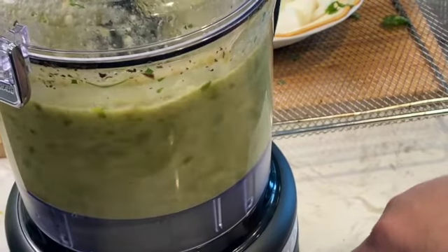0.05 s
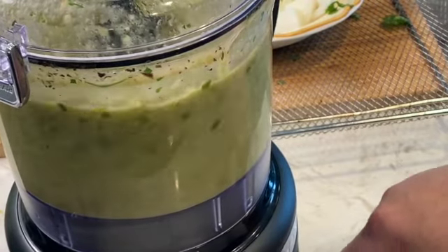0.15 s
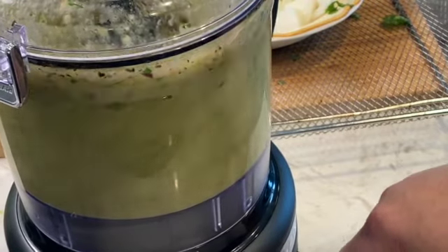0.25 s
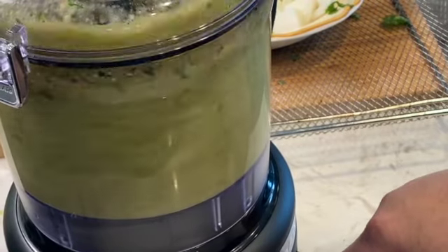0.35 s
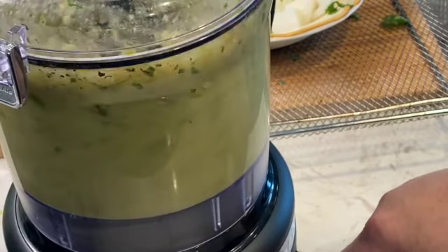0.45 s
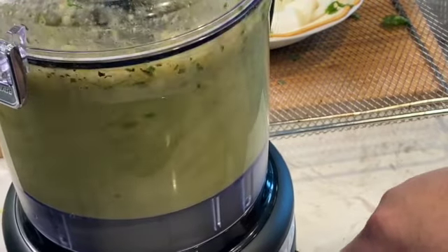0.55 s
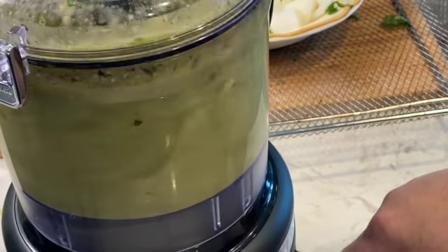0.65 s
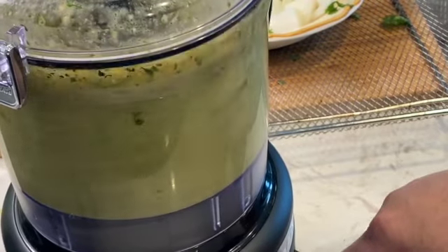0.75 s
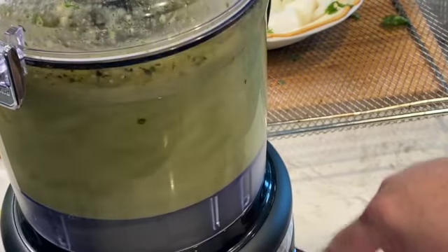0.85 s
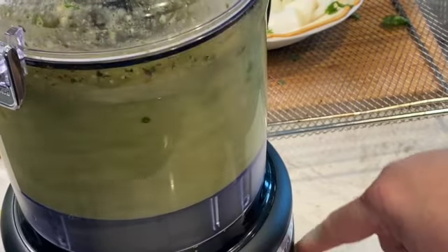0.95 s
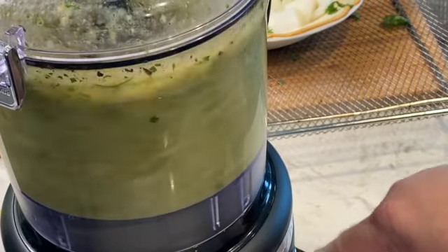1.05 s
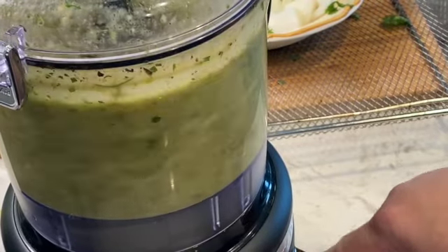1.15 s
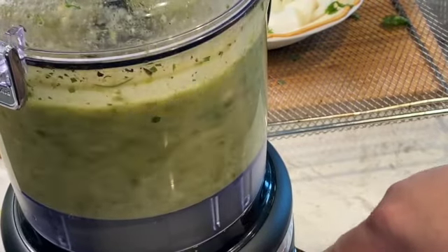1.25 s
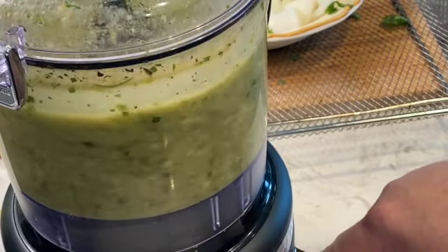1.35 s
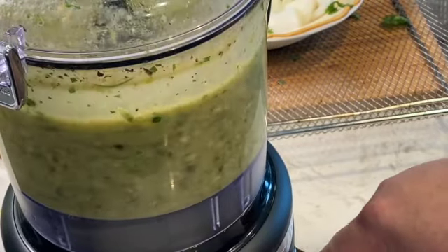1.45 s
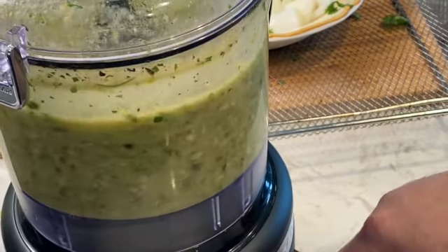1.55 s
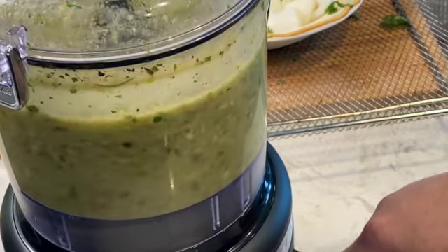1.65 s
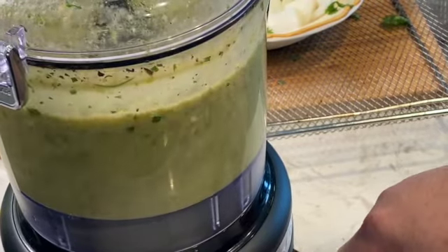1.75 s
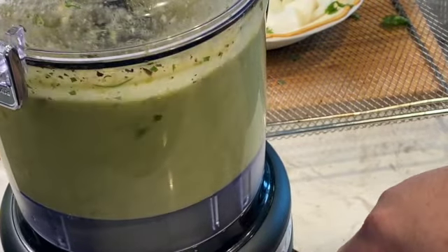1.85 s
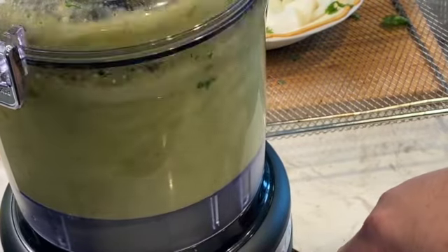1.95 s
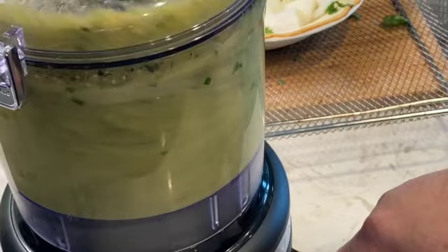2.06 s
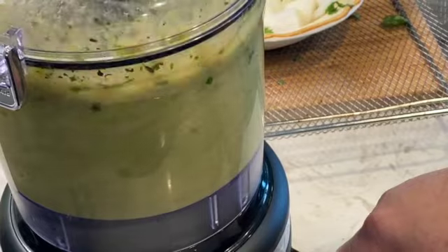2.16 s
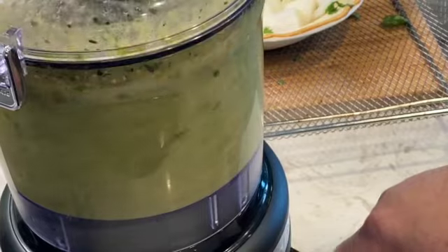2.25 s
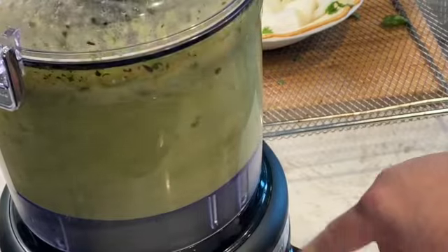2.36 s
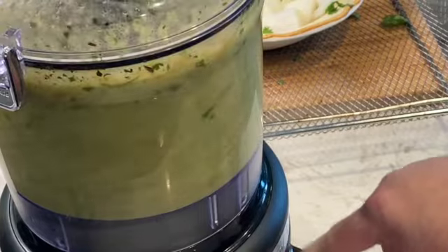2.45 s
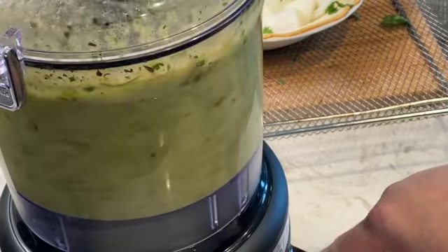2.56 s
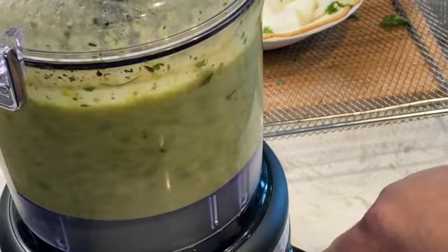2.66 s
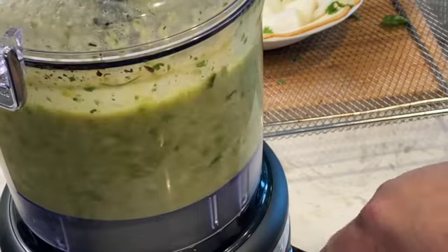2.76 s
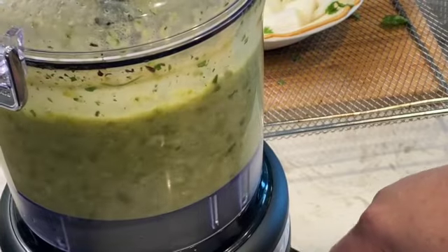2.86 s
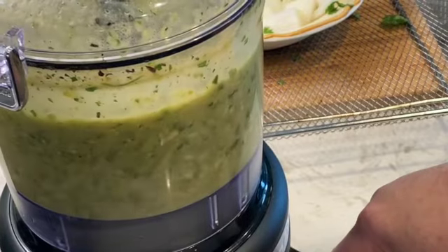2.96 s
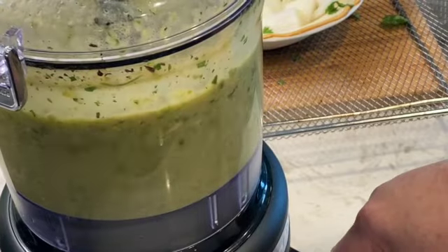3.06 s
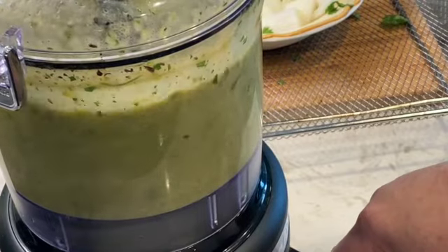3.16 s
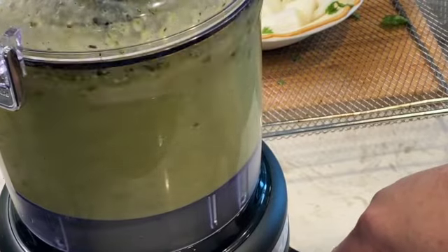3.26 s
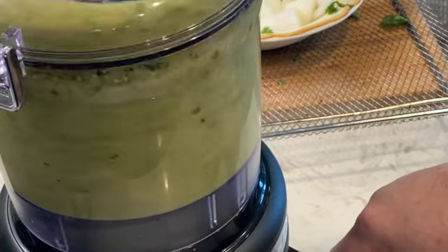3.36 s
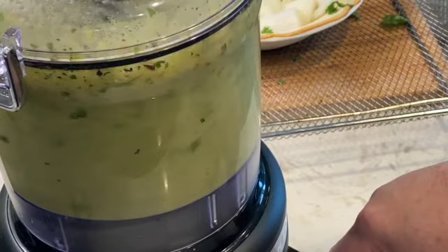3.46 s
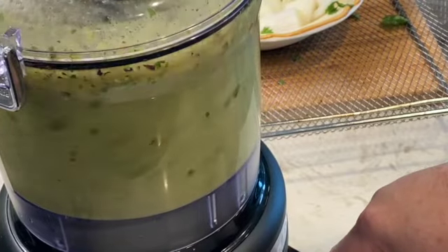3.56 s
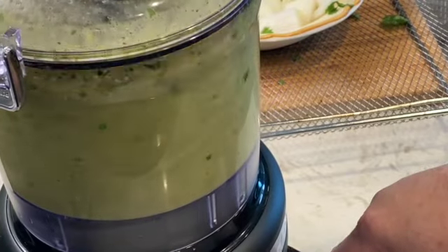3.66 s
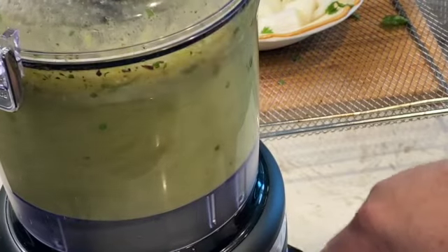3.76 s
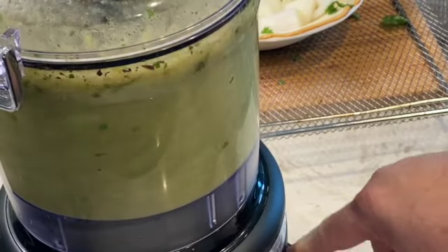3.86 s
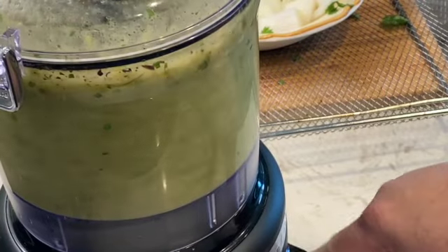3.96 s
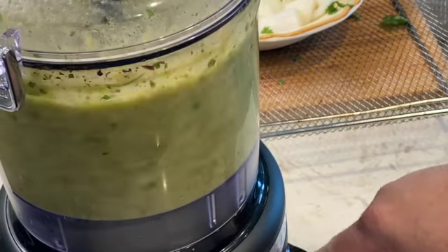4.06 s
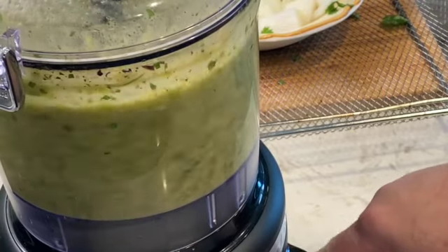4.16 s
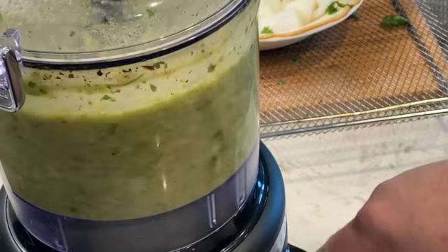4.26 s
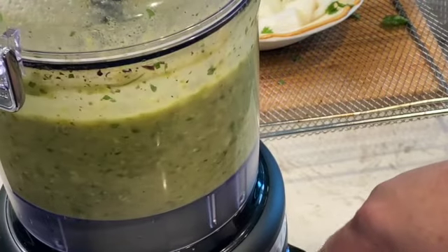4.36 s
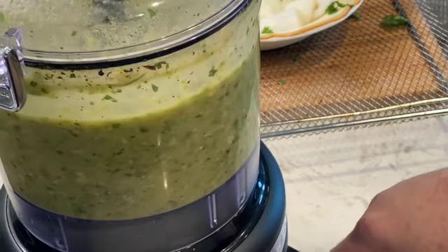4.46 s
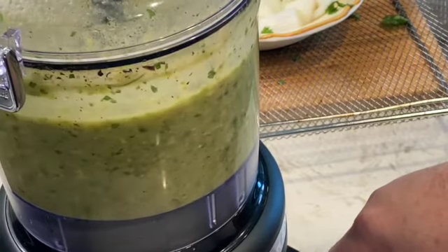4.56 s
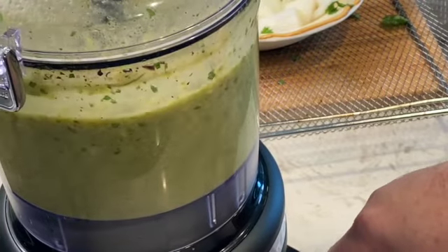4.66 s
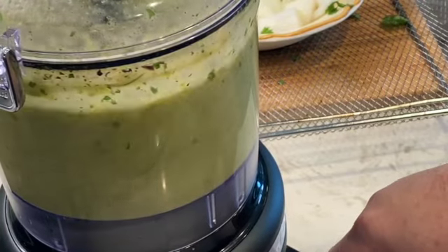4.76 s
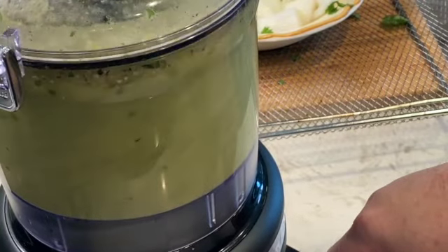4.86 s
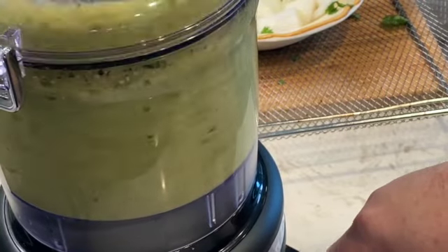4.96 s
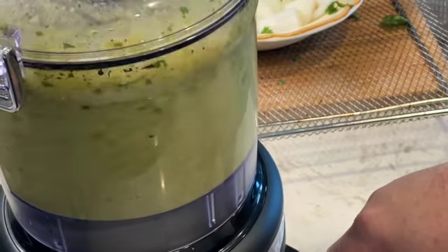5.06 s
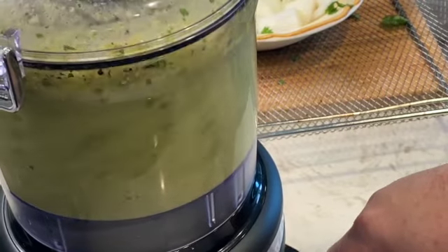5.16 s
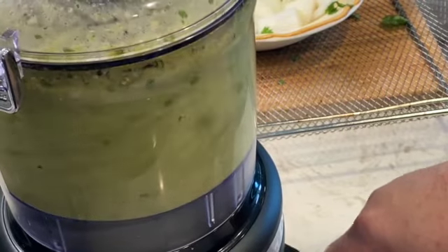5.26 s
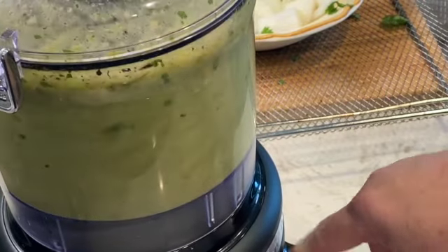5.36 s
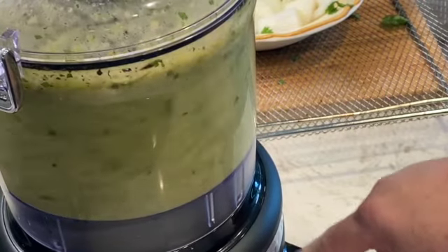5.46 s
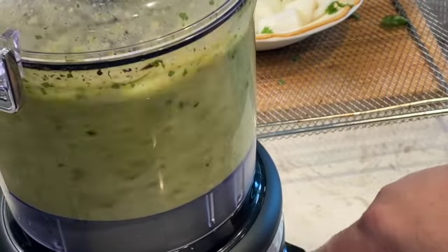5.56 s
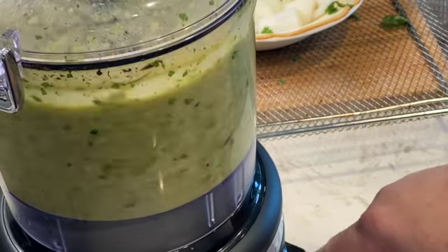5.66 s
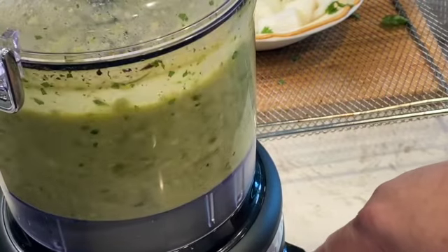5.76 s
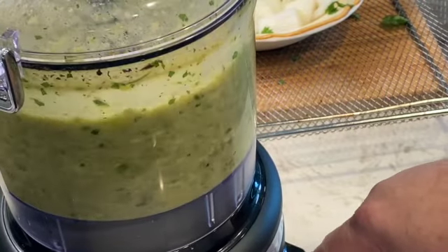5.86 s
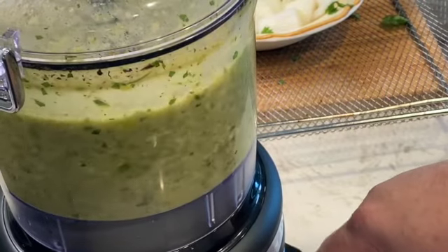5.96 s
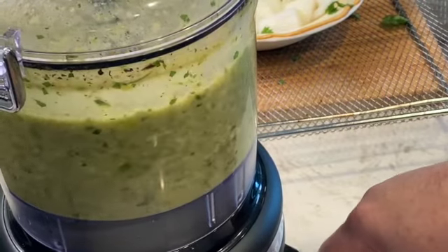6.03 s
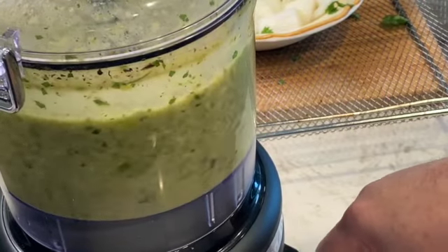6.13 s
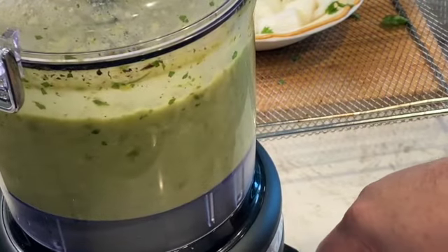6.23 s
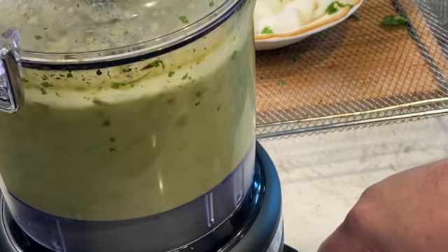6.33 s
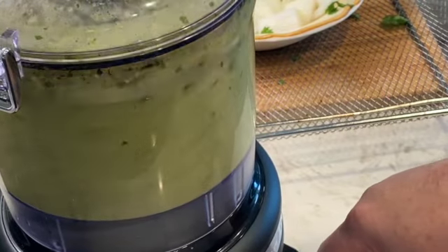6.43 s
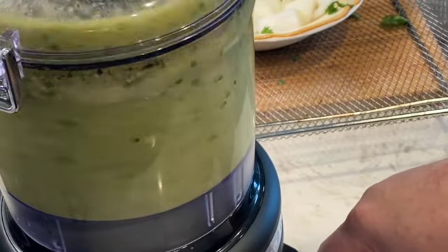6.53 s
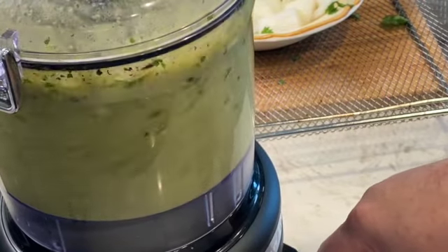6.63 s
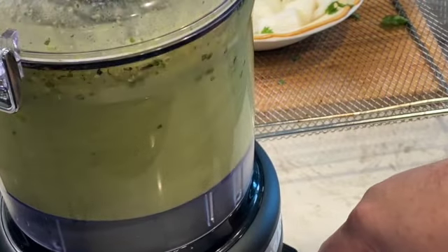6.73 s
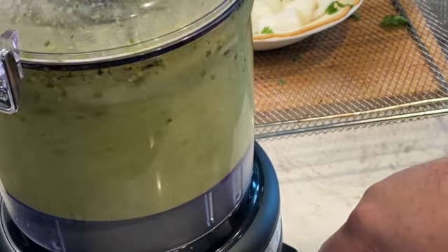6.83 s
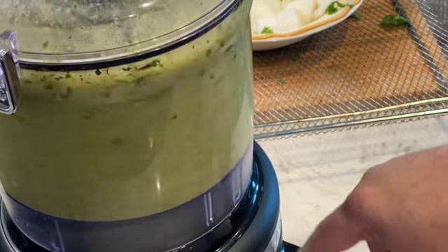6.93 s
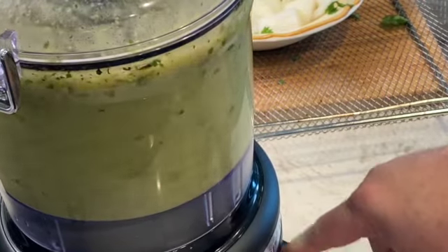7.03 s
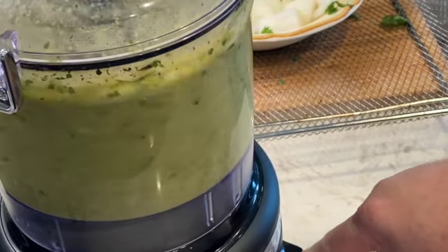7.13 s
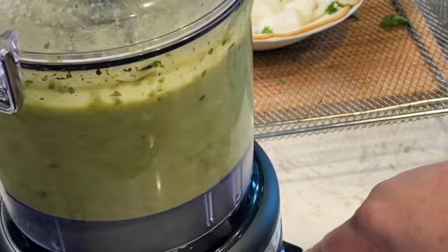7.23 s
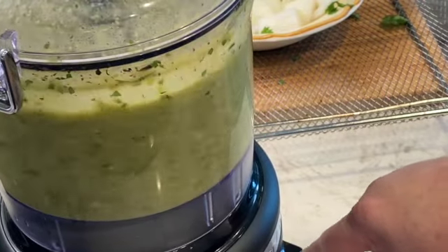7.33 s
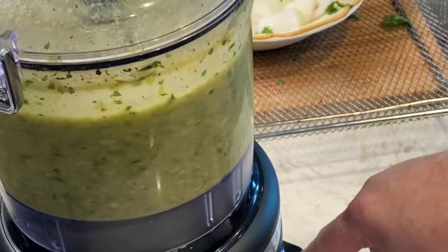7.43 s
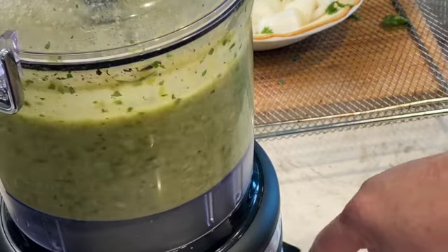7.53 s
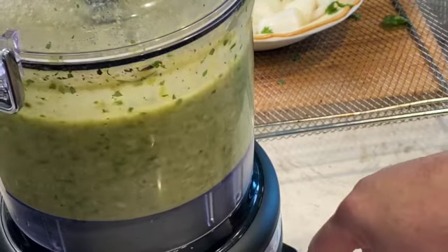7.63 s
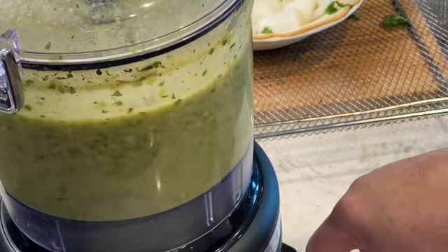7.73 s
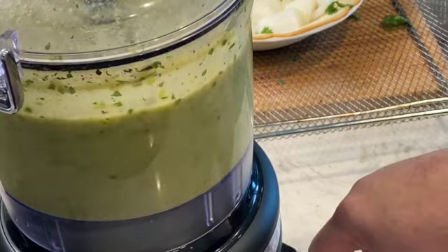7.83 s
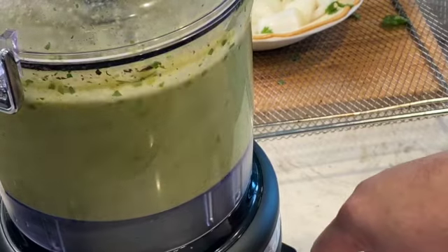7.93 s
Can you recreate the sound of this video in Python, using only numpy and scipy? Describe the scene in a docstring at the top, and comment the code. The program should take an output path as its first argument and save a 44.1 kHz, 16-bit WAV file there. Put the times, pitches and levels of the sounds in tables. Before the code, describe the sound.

A food processor holding thick green soup is pulsed six times in a hard-walled kitchen, heard close in stereo. It engages at once at the start, then near 1.6, 2.9, 4.5, 6.1 and 7.6 seconds, the last still running at the end. Before each later burst a small plastic button click comes about a tenth of a second ahead, then a sharp double knock as the drive takes up. The gear whine leaps up, rough and strained, and over half a second creeps higher into a cleaner, shrill tone. Dense wet churning, housing rattle and a low fluctuating counter drone run with it. After about 0.8 seconds each is let go: whine drops quickly and vanishes, soup turns duller, lumpy and gurgling, and slack drive parts knock, strongest near 2.5 and 3.9 seconds. Faint ticks, short reflections and very quiet low room tone fill the gaps.

```python
"""A food processor is pulsed six times: its motor runs up with a gear whine and coasts down when let go.
The whine is tones and noise bands locked to the shaft; the churn of thick soup is patchy noise beaten
by the blades; the drone is jolts and noise ringing the base on the kitchen counter.
Noise bursts make the button clicks and the knocks in the drive.
A hard-walled kitchen answers with decaying noise, over a faint room tone."""
import sys
import numpy as np
from scipy import signal
from scipy.fft import rfft, irfft, next_fast_len
from scipy.io import wavfile
from scipy.ndimage import uniform_filter1d, map_coordinates

SR = 44100
rng = np.random.default_rng(int(sys.argv[2]) if len(sys.argv) > 2 else 0)


def wrap_up_sound(samples):
    """Save the sound to the file named by the first command line argument, as 16-bit audio."""
    columns = np.atleast_2d(samples).T
    # keep every value between -1 and 1, then stretch to whole-number steps
    tamed = np.clip(columns, -1, 1)
    steps = np.round(tamed * 32767).astype(np.int16)
    wavfile.write(sys.argv[1], SR, steps)


N = 352359
T = np.arange(N) / SR

# The six pulses. Each row: drive engages in seconds, button touched this many seconds before that,
# soup up to speed this many seconds after, let go this many seconds after, churn level in dB,
# drone level in dB, level of the first knock in dB.
PULSES = [(0.045, 0.1, 0.36, 0.85, -20, -25.5, 0.5), (1.622, .097, .46, 0.74, -19.5, -24.5, -0.5),
          (2.949, .096, .42, .81, -20, -24, 3.5), (4.499, .1025, .46, .80, -20, -25, -7),
          (6.054, .0944, .48, 0.85, -20, -24.5, -2.5), (7.632, .0935, .46, .8, -21, -25, -0.5)]
# Resonances of bowl and housing. Each row: frequency in Hz, width in Hz, level in dB.
HOUSING = [(864, 300, -5), (1178, 100, 3), (1406, 64, -0.5), (1658.5, 74, 4), (2056, 42, -7.5),
           (2184, 79, 2.5), (2550, 210, -1), (2820, 170, 6), (3053, 110, 6.5), (4470, 33, -6.5)]
TEETH = 43  # mesh cycles a blade turn
FULL_HZ = 1869  # mesh rate that counts as full speed


def amp(db):
    """Gain of a level in dB."""
    return 10 ** (np.asarray(db) / 20)


def unit(x):
    """x at rms 1."""
    return x / np.sqrt(np.mean(x ** 2) + 1e-20)


def along(points, hz):
    """Read a curve of (Hz, value) points on a log frequency axis."""
    f, v = np.transpose(points)
    return np.interp(np.log(hz + 1), np.log(f + 1), v)


def wobble(rate):
    """A smooth random curve through rate knots a second."""
    knots = rng.standard_normal(int(N * rate / SR) + 4)
    return map_coordinates(knots, [T * rate], order=2)


def filtered(x, response):
    """x shaped by a complex response of frequency."""
    m = next_fast_len(N + SR // 4)
    return irfft(rfft(x, m) * response(np.fft.rfftfreq(m, 1 / SR)), m)[..., :N]


def modes(table):
    """Causal response of (Hz, width in Hz, dB) resonances, alternating in sign."""
    def response(f):
        total = 0
        for k, (centre, width, db) in enumerate(table):
            damping = 1j * f * width
            total = total + (-1) ** k * amp(db) * damping / (centre * centre - f * f + damping)
        return total
    return response


def patchy(depth_db):
    """Noise with patches of random gain in time and frequency."""
    z = signal.stft(rng.standard_normal(N), nperseg=512)[2]
    field = uniform_filter1d(rng.standard_normal(z.shape), size=6, axis=0)
    field = uniform_filter1d(field, size=6, axis=1)
    return signal.istft(z * amp(depth_db * unit(field)), nperseg=512)[1][:N]


def machine():
    """Whine, churn and drone all follow one shaft, so they run up and coast down together."""
    since, whirl, coast, churn_db, drone_db = controls()
    hz = speed(since, whirl, coast)
    off = 1. * (coast > 0)
    unsteady = (.002 + 0.01178 * (1 - whirl) ** .5) * wobble(50)
    mesh = 2 * np.pi * np.cumsum(hz * (1 + unsteady)) / SR
    turn = mesh / TEETH
    slow = np.clip(1 - hz / FULL_HZ, 0, .6)
    # the teeth strain while the motor gains speed and unload once the current is cut
    strain = np.clip((FULL_HZ - hz) / 75, 0, 1) * (1 - off)

    whine_db, whine_out_s = -1, .17  # over the churn; gone this long after the button is let go
    whine = gears(mesh, strain) * amp(whine_db + 5.03 * strain - 66 * slow * off)
    whine = whine * np.clip((whine_out_s - coast) / 0.023, 0, 1)
    whine = whine * np.clip(since / .03, .45, 1)
    churn = soup(turn, slow, strain, off)

    drag_db, surge_db, surge_s = 2, 3, .05  # extra while the soup is dragged up to speed; first bite
    churn_db = churn_db + drag_db * strain + surge_db * np.exp(-np.abs(since) / surge_s)
    drone_db = drone_db + 2.5 * wobble(14)  # the drone swells and dips at random
    sound = amp(churn_db) * (whine + churn) + amp(drone_db) * base_drone(turn, hz)
    return (since >= 0) * sound


def controls():
    """Per sample: seconds since engaging, run-up share, seconds since letting go, churn and drone dB."""
    # The fall in level while coasting, the same after each pulse. Each row: seconds after letting go,
    # change of the churn in dB, change of the drone in dB.
    coasting = [(0, -0.5, -0.5), (.1, -2, -2.5), (.2, -10.5, -18), (0.258, -21, -20.5), (.32, -29.5, -21.5),
                (.45, -45.5, -28), (.6, -58.5, -57.5)]
    after, churn_fall, drone_fall = np.transpose(coasting)
    rows = np.array(PULSES)
    now = rows[np.clip(np.searchsorted(rows[:, 0], T) - 1, 0, None)].T
    since = T - now[0]
    whirl = np.clip(since / now[2], 0, 1)
    coast = np.clip(since - now[3], 0, None)
    churn_db = now[4] + np.interp(coast, after, churn_fall)
    drone_db = now[5] + np.interp(coast, after, drone_fall)
    return since, whirl, coast, churn_db, drone_db


def speed(since, whirl, coast):
    """Mesh rate: the rotor leaps up, creeps on as the soup starts to whirl, and slows once let go."""
    loaded_hz, free_hz = 1547, 1859.4  # mesh rate in still and in whirling soup
    spin_up_s, slow_down_s = .06, .25  # time constants of rotor and coasting
    head_start_s = .017  # the rotor starts this long before the drive engages
    # tanh: run-up against a drag that grows with speed squared
    leap = np.tanh((np.abs(since) + head_start_s) / spin_up_s)
    return (loaded_hz + (free_hz - loaded_hz) * whirl) * leap * np.exp(-coast / slow_down_s)


def gears(mesh, strain):
    """Clean lines sit inside noise bands; below full speed the teeth strain and the bands take over."""
    # Multiples of the mesh rate, from the first up. Each row: clean line level in dB, blurred band level
    # in dB, band width in Hz, gain of the band under strain in dB, depth of the throb with the turn 0-1.
    multiples = [(-15, -2, 130, -1.5, 1), (-4, -14.5, 360, 10.5, .2), (-32, -10, 640, 5, 0.3),
                 (-30.5, -12, 700, 3, 0.2), (-38, -21, 970, 4, 0.03), (-46, -33, 480, 13, 0)]
    # Clean lines beside the mesh tone once the drive runs free. Each row: blade turns above the mesh # rate
    # (rounded to whole turns, halves to the even one), level in dB.
    sidebands = [(-7, -13), (-4, -4.5), (-4, -13), (-1, -11), (-0.5, -13.5), (2.5, -3), (4.5, -15.5)]
    whine = 0
    for k, (line_db, band_db, width_hz, strain_db, throb) in enumerate(multiples):
        a, b = rng.uniform(0, 2 * np.pi, size=2)
        phase = (k + 1) * mesh
        # uneven teeth: strength repeats each turn and half turn, which makes sidebands
        swing = 1 + throb * (np.sin(mesh / TEETH + a) + np.sin(2 * mesh / TEETH + b))
        line = amp(line_db + 2.0 * wobble(30)) * (1 - .8 * strain) * np.sin(phase)
        band = wobble(width_hz) * np.sin(phase) + wobble(width_hz) * np.cos(phase)
        whine = whine + swing * (line + amp(band_db + strain_db * strain) * band)
    for turns, db in sidebands:
        phase = (1 + round(turns) / TEETH) * mesh + rng.uniform(0, 2 * np.pi)
        whine = whine + amp(db + 2.5 * wobble(12)) * (1 - strain) * np.sin(phase)

    def housing_colour(f):
        low_cut = 1 + (950 / (f + 1)) ** 4  # the housing is too small to send out low tones
        return (0.67 + 1.4 * modes(HOUSING)(f)) / low_cut
    return filtered(unit(whine), housing_colour)


def soup(turn, slow, strain, off):
    """Blades beat patchy noise into soup and housing rattle; the bowl rings with gurgle and slump."""
    # Colour of the churn. Each row: frequency in Hz, relative level in dB.
    churn_colour = [(18, -48.5), (30, -15), (124, -16), (205, -6.5), (260, -19.5), (994, -21.5),
                    (1870, -13), (3340, -18.5), (7550, -23), (8300, -25), (10900, -30.5), (14600, -30.5),
                    (15900, -24.5), (16300, -45.5)]
    # Resonances of the soup-filled bowl, two for the gurgle, then two for the slump.
    # Each row: frequency in Hz, width in Hz, level in dB.
    bowl = [(618, 45, -6.5), (678, 80, 0.5), (926, 27, 4), (1036, 14, -2.5)]
    mains_hz = 120  # magnetic pull, twice the line frequency
    # two blades sweep the soup each turn; the mains pull shakes the rotor
    beat_db = .9 * np.sin(2 * turn) + 1.1 * np.sin(2 * np.pi * mains_hz * T) + 1.1 * wobble(150)
    beat = amp(beat_db)
    splash = unit(filtered(beat * patchy(depth_db=2.5), lambda f: amp(along(churn_colour, f))))
    rattle = unit(filtered(beat * patchy(depth_db=1.0), modes(HOUSING))) * amp(3.7 * slow)
    # once the soup whirls freely it gurgles in the bowl, most clearly as it slumps back
    gurgle = unit(filtered(amp(3.5 * wobble(18)) * rng.standard_normal(N), modes(bowl[:2])))
    gurgle = gurgle * amp(-16.5 - 15 * strain + 1.7 * slow * off)
    slump = unit(filtered(amp(4.5 * wobble(25)) * rng.standard_normal(N), modes(bowl[2:])))
    slump = slump * amp(-32.5 + 41.2 * slow * off)
    churn = amp(-5.5) * splash + amp(-9.0) * rattle + gurgle + slump
    dull = filtered(churn, lambda f: 1 / (1 + (f / 1800) ** 2.2))
    spray = (churn - dull) * amp(-27 * slow * off)  # coasting blades spray less
    lumps = amp(slow * (5.5 * np.sin(2 * turn) + 8.2 * wobble(22)))  # a slow blade meets lumps
    return lumps * (dull + spray)


def base_drone(turn, hz):
    """One jolt each blade turn, and noise, shake the base into resonance on the counter."""
    # Resonances of the base on the counter. Each row: frequency in Hz, width in Hz, level in dB.
    base = [(118, 23, -17), (172.5, 14, -6.5), (213, 16.2, 1), (312.5, 46, -12), (410.2, 66, -14)]
    jolts = np.diff(np.floor(turn / (2 * np.pi)), prepend=0) * amp(2.5 * wobble(40))
    shake = unit(jolts) + 1.4 * (hz / FULL_HZ) ** 0.69 * rng.standard_normal(N)

    def base_colour(f):
        dip = 1 - .85 * modes([(259, 46, 0)])(f)  # the base sends out little here
        return modes(base)(f) * dip / (1 + (140 / (f + 1)) ** 4) / (1 + (f / 700) ** 2)
    return unit(filtered(shake, base_colour))


def contacts():
    """Small plastic clicks of the button, and heavier knocks that ring the housing."""
    # Faint ticks as things settle. Each row: start in seconds, level in dB, low part in dB.
    ticks = [(1.2426, -34.5, -6), (1.3514, -41.5, -1), (2.6878, -46, 14.5), (4.3365, -42, 0)]
    # Slack in the drive knocks as it stops. Each row: start in seconds, level in dB.
    stops = [(1.039, -19), (2.491, -14), (3.945, -13), (3.98, -21), (5.553, -40), (7.089, -27)]
    button_db, button_low_db, switch_db, switch_low_db = -23, -22, -16, -13  # level, low part under it
    switch_s = .015  # the current flows this long before the slack is taken up
    rebound_s, rebound_db = .019, -8  # the drive knocks a second time
    clicks, blows, t = np.zeros(N + SR), np.zeros(N + SR), T[:SR // 10]
    # a touch that would fall before the start is left out
    taps = [(s - lead, button_db, button_low_db) for s, lead, *_ in PULSES if s > lead]
    taps += [(s - switch_s, switch_db, switch_low_db) for s, *_ in PULSES]
    taps += ticks
    knocks = [(s, db) for s, *_, db in PULSES]
    knocks += [(s + rebound_s, rebound_db) for s, *_ in PULSES]
    knocks += stops
    for s, db, low_db in taps:
        snap, thud = rng.standard_normal((2, len(t)))
        snap = snap * amp(-60 * t / .055)
        thud = uniform_filter1d(thud, size=14) * amp(low_db + 8.0 - 60 * t / 0.16)
        clicks[round(s * SR):][:len(t)] += amp(db - 11) * (snap + thud)
    for s, db in knocks:
        blow = amp(db - 18 - 60 * t / 0.024) * rng.standard_normal(len(t))
        blows[round(s * SR):][:len(t)] += blow

    def knock_colour(f):
        direct = 0.2 * f / (f + 400) / (1 + (f / 7000) ** 2)
        return 6.5 * modes(HOUSING)(f) + direct
    soft_clicks = filtered(clicks[:N], lambda f: 1 / (1 + (f / 8000) ** 2))
    return soft_clicks + filtered(blows[:N], knock_colour)


def kitchen(x):
    """The hard-walled room answers with a noise tail; each frequency dies at its own speed."""
    # Decay of the room. Each row: frequency in Hz, time to fall by 60 dB in seconds.
    decay = [(200, 0.32), (1500, 0.34), (10000, 0.25)]
    hz, t, z = signal.stft(rng.standard_normal(SR // 2), SR, nperseg=256)
    fading = z * amp(-60 * t / along(decay, hz)[:, None])
    tail = signal.istft(fading, SR, nperseg=256)[1]
    return signal.fftconvolve(x, tail / np.linalg.norm(tail))[:N]


def room_tone():
    """Two independent steady noises, coloured as the faint tone of the room."""
    # Colour of the room tone. Each row: frequency in Hz, relative level in dB.
    tone_colour = [(15, -31), (25, -2.5), (70, 1), (97, -13.5), (224, -16), (1140, -26), (2320, -25.5),
                   (9000, -64), (11700, -79), (19800, -120)]
    noise = rng.standard_normal((2, N))
    return amp(-55.5) * unit(filtered(noise, lambda f: amp(along(tone_colour, f))))


def scene():
    """The direct sound is shared by both sides; the room adds to both and sets them apart."""
    # Stereo spread. Each row: frequency in Hz, gain of the side signal in dB.
    spread = [(60, -27), (99, -22), (160, -29.5), (270, -11.5), (450, -9), (740, -8.5), (1220, -8),
              (2010, -10), (3330, -18), (4300, -39.5), (6500, -38.5), (8000, -10.5), (15000, -11)]
    # Balance of the two sides. Each row: frequency in Hz, left over right in dB.
    lean = [(60, 0), (180, 0.4), (550, 3), (1650, 1.5), (3500, 0.0), (15000, 1.5)]
    port_lag_s, port_from_hz = .000292, 6880  # in the treble the left microphone port lags the right
    near = machine() + contacts()
    tone = room_tone()
    mid = near + amp(-8.0) * kitchen(near) + tone[0]
    side = filtered(kitchen(near) + tone[1], lambda f: amp(along(spread, f)))

    def left_right(f):
        balance = amp(along(lean, f) * [[.5], [-.5]])
        lag = np.pi * port_lag_s * np.clip(f - port_from_hz, 0, None) * [[1], [-1]]
        return balance * np.exp(-1j * lag)
    return filtered(np.array([mid + side, mid - side]), left_right)


def record(dry):
    """The loudest peaks round off at full scale; the microphone drops deep bass and has a top limit."""
    top_hz = 16344  # nothing passes above
    soft = dry / (1 + np.abs(dry) ** 8) ** (1 / 8)
    return filtered(soft, lambda hz: (hz < top_hz) / (1 + (38 / (hz + 1)) ** 4))


dry = scene()
out = record(dry)
wrap_up_sound(out)
```